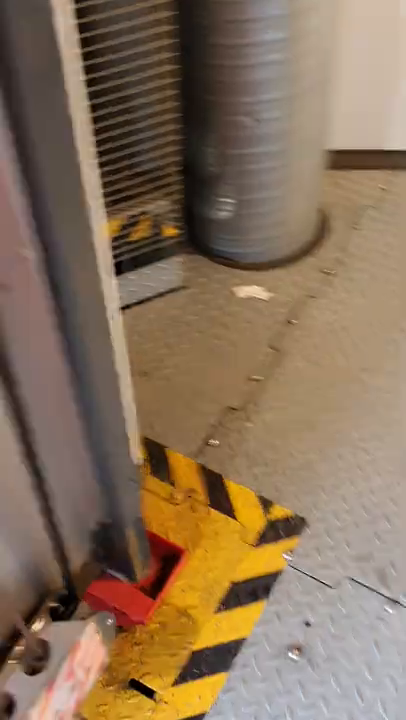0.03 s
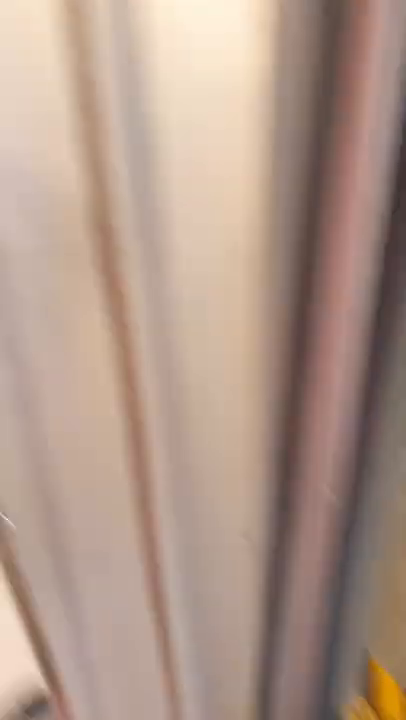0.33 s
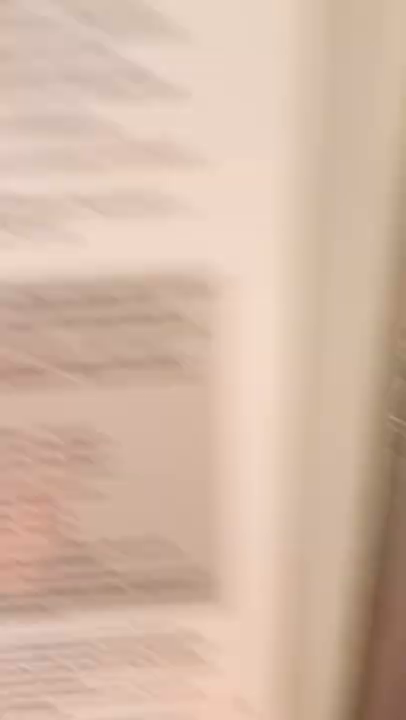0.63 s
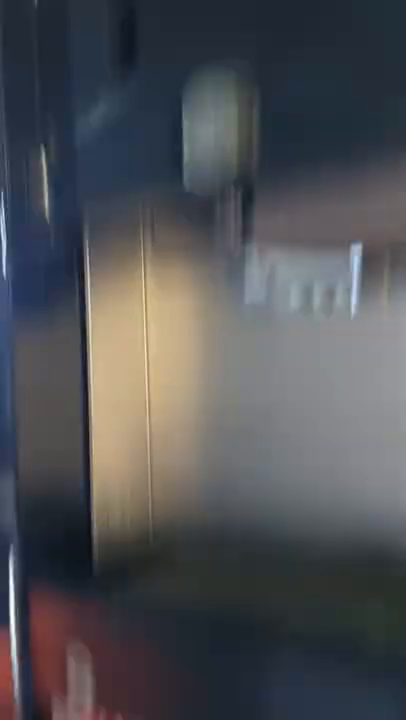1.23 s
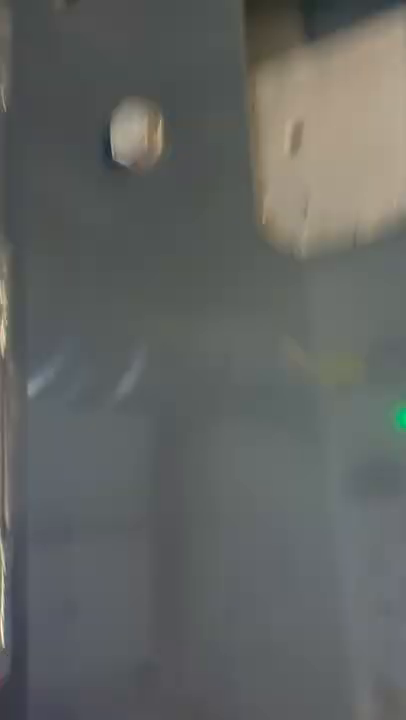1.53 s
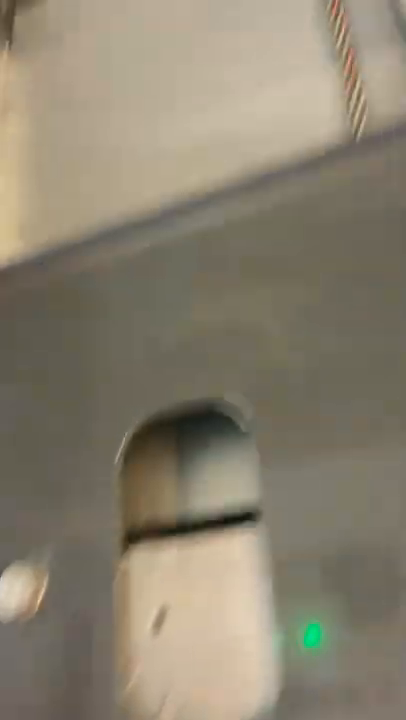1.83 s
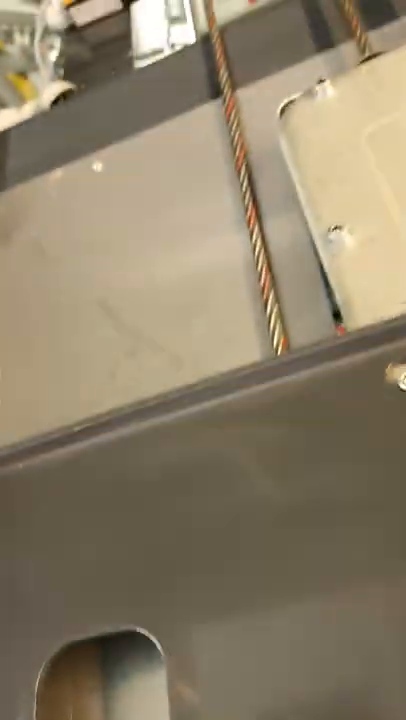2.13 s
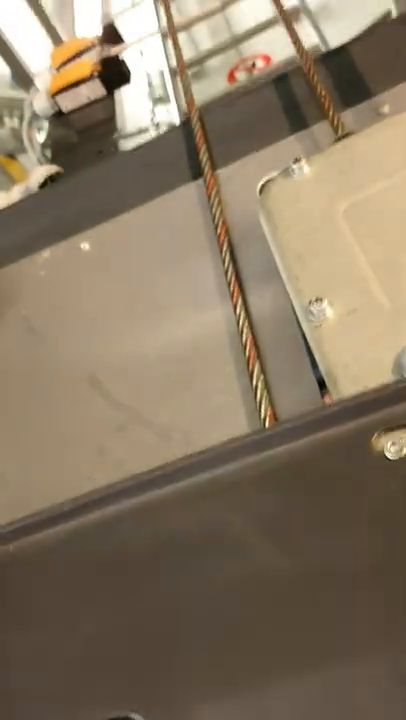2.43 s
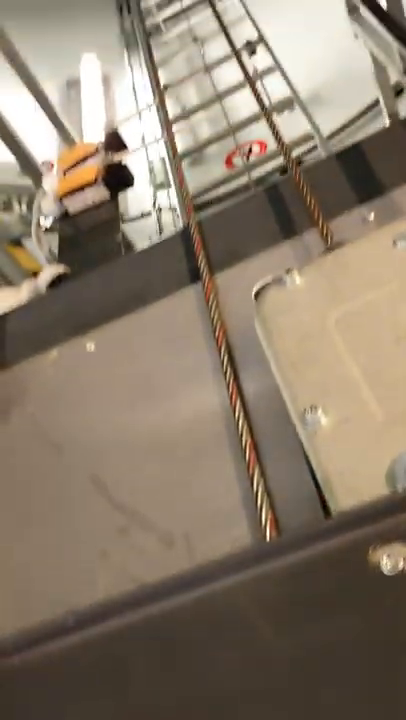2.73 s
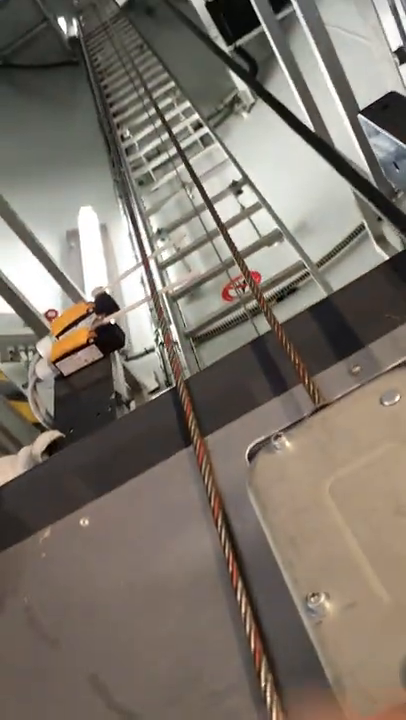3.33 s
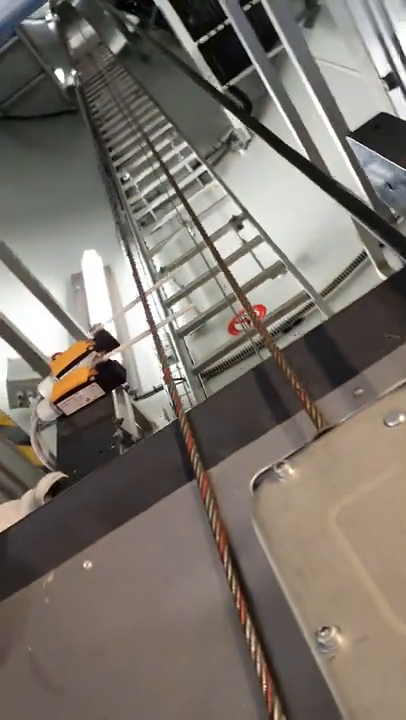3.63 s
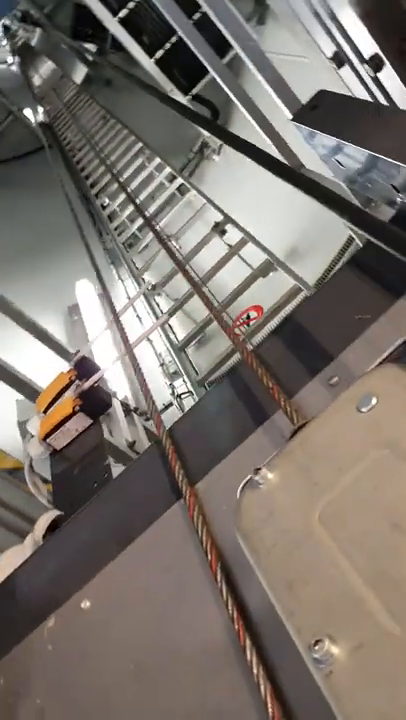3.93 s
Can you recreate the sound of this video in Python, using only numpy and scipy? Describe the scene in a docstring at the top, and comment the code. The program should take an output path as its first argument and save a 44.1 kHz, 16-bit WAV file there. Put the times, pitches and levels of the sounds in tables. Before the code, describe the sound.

Ventilation fans roar inside a steel tower, with a high whine and one loud handling thump.

```python
"""Inside a tall steel tower, cooling fans roar and hum, a motor drones and a power converter whines in
clusters of lines. A camera with two microphones moves from a doorway to the foot of the ladder shaft,
through standing waves that make the fan and converter tones swell and fade. On the way a finger covers
and bumps the right microphone; the gain control ducks, holds for a second and comes back."""
import sys
import numpy as np
from scipy import signal
from scipy.fft import rfft, irfft
from scipy.io import wavfile
from scipy.ndimage import uniform_filter1d, minimum_filter1d

SR = 44100
rng = np.random.default_rng(int(sys.argv[2]) if len(sys.argv) > 2 else 0)


def digitize_waveform(pressure):
    """Quantize a signal to 16-bit integers and store it at the path in sys.argv[1].

    Rows of a 2-D input are taken as channels; values are limited to [-1, 1].
    """
    field = np.atleast_2d(pressure).T
    bounded = np.clip(field, -1, 1)
    quanta = np.round(bounded * 32767).astype(np.int16)
    wavfile.write(sys.argv[1], SR, quanta)


N = 176400
T = np.arange(N) / SR
HZ = np.maximum(np.fft.rfftfreq(N, 1 / SR), 1)
MIC_SPACING_M, SOUND_M_PER_S = 0.18, 360
SPLIT = np.array([[.5], [-.5]])   # shares a difference between left and right


def roar():
    """Turbulent fan air makes broadband noise, coloured differently at the doorway and the shaft."""
    # air spectrum at each place: frequency_hz, relative_density_db
    door_spectrum = [(18, -19), (30, -5), (225, -3), (327, -2.5), (447, -3.5), (550, -8), (623, -3),
                     (735, -11), (964, -10), (1070, -2.5), (1340, -10.5), (2560, -13.5), (4300, -18.5),
                     (5590, -60), (9460, -120)]
    shaft_spectrum = [(18, -36), (30, -12), (179, -5), (456, -6.5), (561, -7.5), (610, -8), (677, -8.5),
                      (887, -4.5), (1070, -10), (1240, -8.5), (1490, -13), (2670, -15.5), (4300, -21.5),
                      (5590, -62), (9460, -120)]
    # stereo balance at each place: frequency_hz, left_minus_right_db
    door_balance = [(60, -5.5), (130, -2.5), (290, -3), (640, -2.5), (1410, -2), (3100, -1.5), (6820, -1.5),
                    (15000, 3)]
    shaft_balance = [(60, -3), (130, -5), (290, -4), (640, -3), (1410, -7), (3100, -3.5), (6820, -2),
                     (15000, 3)]
    door = from_db(-19) * rushing_air(door_spectrum, door_balance, hiss_db=-19)
    shaft = from_db(-17.5) * rushing_air(shaft_spectrum, shaft_balance, hiss_db=-21.5)
    return crossfade(door, shaft, start_s=1, end_s=2.21)


def rushing_air(spectrum, balance, hiss_db):
    """Incoherent noises add in power: the roar below, its hiss above."""
    # hiss spectrum: frequency_hz, relative_density_db
    hiss = [(4000, -30), (4450, -1), (5200, -1), (5700, -6), (7200, -8), (8600, -18), (10400, -18),
            (11500, -23), (13000, -20.5), (15500, -25)]
    rush = np.hypot(colour(spectrum), from_db(hiss_db) * colour(hiss))
    return diffuse_noise(rush * colour(balance) ** SPLIT)


def tower_ringing():
    """Resonance: stirred by the fans, the tower rings in narrow bands."""
    # modes: centre_hz, half_width_hz, level_db
    modes = [(139.2, 5.2, -32.5), (174.8, 9.8, -31.5), (241, 7.5, -39), (298, 8, -39), (340.8, 5, -32.5),
             (442, 11, -35.5), (724.7, 11.3, -35), (807, 11, -37.5), (865, 30, -35)]
    return sum(from_db(db) * diffuse_noise(1 / (1 + ((HZ - hz) / width) ** 2)) for hz, width, db in modes)


def fan_blades():
    """Periodic blade passage makes tones whose pitch follows the slightly unsteady speed."""
    # blade tones: pitch_hz, relative_level_db
    tones = [(620, -30.5), (1239, -38), (1858, -43), (2751, -45.5)]
    # their strength along the way: time_s, gain_db, left_minus_right_db
    strength = [(.1, -6.5, -5), (.35, 6, 0), (.6, -3.5, -8), (1.1, -3, 1), (1.45, 7, -5), (1.95, -1.5, -4),
                (2.7, 4.5, 1), (3.1, 4, 1), (4, 3, 1.5)]
    speed = 1 + 0.0025 * drift(rate_hz=4.2)
    time_s, gain_db, pan_db = np.transpose(strength)
    gain = from_db(np.interp(T, time_s, gain_db) + np.interp(T, time_s, pan_db) * SPLIT)
    return gain * sum(from_db(db) * room_tone(hz, scatter=0.052, speed=speed) for hz, db in tones)


def converter_whine():
    """Sidebands of the switching rate beat into a thin buzz, weighted higher as the camera looks up."""
    # main lines facing ahead and up, overtones, top whistle: pitch_hz, relative_level_db
    ahead_lines = [(4802, -52), (4899, -39), (5001, -46), (5098, -40), (5152, -56), (5200, -39.5),
                   (5303, -51), (5502, -52)]
    up_lines = [(4802, -54), (4850, -58), (4899, -44), (5001, -45), (5098, -38), (5152, -48), (5200, -37),
                (5303, -51), (5502, -55)]
    overtone_lines = [(7348, -61), (7450, -59), (7553, -54), (7650, -59), (7752, -62), (7951, -60),
                      (8053, -63), (8150, -64), (8253, -64), (9902, -63), (10002, -64), (10102, -59),
                      (10202, -60), (10302, -52), (10402, -61), (10502, -58), (10702, -64), (10802, -63),
                      (10902, -64), (12352, -67), (12552, -66), (12852, -67), (13152, -68), (15003, -69)]
    whistle_lines = [(15504, -64), (15601, -58), (15703, -65)]
    # strength along the way: time_s, gain_db
    main_gain = [(.1, 0), (.3, 2.5), (.55, 3), (.65, -5), (.72, 1), (.93, 1.5), (1.04, 0), (1.22, 0),
                 (1.6, -1), (1.95, 0), (2.5, -1), (2.85, -0.5), (3.1, 2.5), (3.7, 3.5), (3.9, -2)]
    whistle_gain = [(0, 4), (1.9, 1.5), (2.3, 5), (2.8, 8), (3.3, 6), (3.7, 6.5), (4, 4)]
    main = from_db(4) * crossfade(cluster(ahead_lines), cluster(up_lines), start_s=2.89, end_s=3.083)
    overtones = from_db(2) * cluster(overtone_lines)
    whistle = level(whistle_gain) * cluster(whistle_lines)
    return level(main_gain) * main + overtones + whistle


def finger_bumps():
    """Each impact excites a damped low oscillation, with a burst of dull friction noise."""
    # impacts: start_s, level_db, pitch_hz
    bumps = [(1.242, -11, 131.5), (1.264, -6.5, 65.4), (1.297, -5, 157), (1.308, 11, 60.5),
             (1.331, 12.5, 96), (1.368, 15, 68), (1.425, 3, 103), (1.65, -12, 100)]
    # skin rubbing on the case: frequency_hz, relative_density_db
    friction = [(25, 5), (80, -2.5), (250, -5), (500, -15.5), (1000, -27), (3000, -43.5), (8000, -72),
                (15000, -58)]
    rub = from_db(-5.5) * unit_rms(irfft(rfft(rng.standard_normal(N)) * colour(friction), N))
    out = np.zeros(N)
    for start_s, db, hz in bumps:
        age = np.clip(T - start_s, 0, 1)
        thud = swell(age, rise_s=0.0038, fall_s=0.022) * np.sin(2 * np.pi * hz * age)
        out += from_db(db) * (thud + rub * swell(age, rise_s=0.0052, fall_s=0.023))
    return out


def motor_hum(pitch_hz=48.4):
    """The motor's periodic vibration gives one deep tone that swells and sinks."""
    # hum envelope: time_s, level_db
    envelope = [(.1, -40), (.3, -30), (.57, -36), (.72, -26.5), (.9, -31), (1.08, -22), (1.55, -47),
                (1.85, -31), (2.4, -38), (2.7, -32), (3.05, -37), (3.6, -30.5), (4, -31)]
    return level(envelope) * unit_rms(np.sin(2 * np.pi * pitch_hz * T))


def cluster(lines):
    """Superposed tones close in pitch beat at their difference frequencies."""
    return sum(from_db(db) * room_tone(hz, scatter=.3) for hz, db in lines)


def room_tone(hz, scatter, speed=1):
    """Interference: a tone fades as the microphones cross standing waves; scatter is its echo share."""
    # camera motion: time_s, speed_m_per_s
    motion = [(0, 0.53), (1.25, .65), (2, 0.32), (2.6, 0.1366), (4, .12)]
    travelled_m = np.cumsum(np.interp(T, *np.transpose(motion))) / SR
    fades = .9 * travelled_m * hz / SOUND_M_PER_S   # 0.9 fades per wavelength
    fade_grid = np.arange(-2, 120, .05)
    pole = np.exp(-2 * np.pi * (fade_grid[1] - fade_grid[0]))
    phasors = rng.standard_normal((2, len(fade_grid), 2)) @ [1, 1j]
    echoes = unit_rms(smooth(phasors, pole))
    direct = np.exp(1j * np.arccos(coherence(hz)) * SPLIT)
    paths = np.sqrt(1 - scatter) * direct + np.sqrt(scatter) * echoes
    carrier = np.exp(2j * np.pi * (hz * np.cumsum(speed * np.ones(N)) / SR + rng.random()))
    return np.array([unit_rms((np.interp(fades, fade_grid, path) * carrier).real) for path in paths])


def diffuse_noise(gain):
    """A diffuse field arrives from all around: stereo noise of the given colour, rms 1."""
    mid, side = rfft(rng.standard_normal((2, N)))
    mid *= np.sqrt(1 + coherence(HZ))
    side *= np.sqrt(1 - coherence(HZ))
    return unit_rms(irfft(np.array([mid + side, mid - side]) * gain, N))


def coherence(hz):
    """Two spaced microphones in a diffuse field correlate by a sinc law."""
    return np.sinc(2 * hz * MIC_SPACING_M / SOUND_M_PER_S)


def drift(rate_hz, hop=40):
    """Low-passed noise wanders slowly, with rms near 1."""
    pole = np.exp(-2 * np.pi * rate_hz * hop / SR)
    slow = smooth(rng.standard_normal(N // hop + 2002), pole)[2000:]
    return np.interp(np.arange(N) / hop, np.arange(len(slow)), unit_rms(slow))


def smooth(x, pole):
    """A double pole acts as a low-pass filter."""
    return signal.lfilter([1], [1, -2 * pole, pole * pole], x)


def crossfade(first, second, start_s, end_s):
    """Sine and cosine weights give an equal-power transition."""
    angle = np.interp(T, (start_s, end_s), [0, np.pi / 2])
    return np.cos(angle) * first + np.sin(angle) * second


def swell(age, rise_s, fall_s):
    """Exponential damping after a rounded attack, peak 1."""
    shape = (1 - np.exp(-(age / rise_s) ** 2)) * np.exp(-age / fall_s)
    return shape / shape.max()


def colour(points):
    """Gain over log frequency from (frequency_hz, gain_db) points."""
    hz, db = np.transpose(points)
    return from_db(np.interp(np.log(HZ), np.log(hz), db))


def level(points):
    """Gain over time from (time_s, gain_db) points."""
    return from_db(np.interp(T, *np.transpose(points)))


def from_db(db):
    """Decibels to amplitude ratio."""
    return 10 ** (np.asarray(db) / 20)


def unit_rms(x):
    """Normalise to unit mean power."""
    return x / np.sqrt(np.mean(np.abs(x) ** 2) + 1e-20)


def release(cut_db, db_per_s):
    """A gain cut recovers linearly in decibels."""
    return np.maximum.accumulate(cut_db + db_per_s * T) - db_per_s * T


def scene(start_s=.068):
    """The sources superpose at both microphones; the finger shadows and bumps the right one."""
    # the finger's acoustic shadow: time_s, gain_db
    shadow = [(1.15, -2), (1.23, 2), (1.275, -31), (1.33, -26), (1.41, -9), (1.45, -3)]
    left, right = roar() + tower_ringing() + motor_hum() + fan_blades() + converter_whine()
    return np.array([left, right * level(shadow) + finger_bumps()]) * (T > start_s)


def record(dry):
    """Compression: a fast limiter and a holding gain control duck both band-limited channels together."""
    low_cut_hz, high_cut_hz = 37, 15800
    ceiling_db, max_duck_db = -.2, 11.5
    hold_s, attack_s = 1.077, 0.0081
    dry = signal.sosfilt(signal.butter(5, low_cut_hz, "high", fs=SR, output="sos"), dry)
    over_db = np.maximum(20 * np.log10(np.abs(dry).max(axis=0) + 1e-9) - ceiling_db, 0)
    half_hold, attack = int(hold_s * SR / 2), int(attack_s * SR)
    duck_db = np.minimum(over_db, max_duck_db)
    held_db = -minimum_filter1d(-duck_db, 2 * half_hold + 1, origin=half_hold, mode="constant")
    cut_db = np.maximum(release(over_db, db_per_s=56), release(held_db, db_per_s=19))
    cut_db = uniform_filter1d(-minimum_filter1d(-cut_db, attack), attack)   # ramps in ahead of each peak
    high_cut = signal.ellip(12, .1, 90, high_cut_hz, fs=SR, output="sos")
    return signal.sosfilt(high_cut, dry * from_db(-cut_db))


dry = scene()
out = record(dry)
digitize_waveform(out)
```